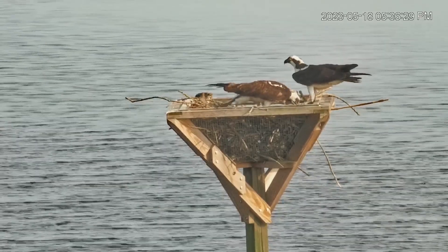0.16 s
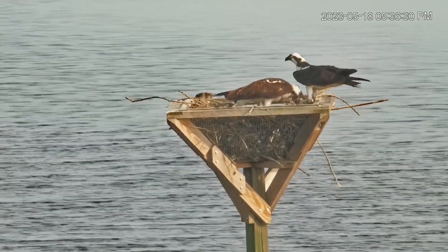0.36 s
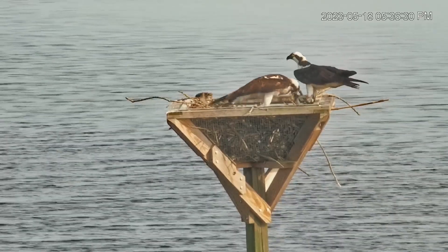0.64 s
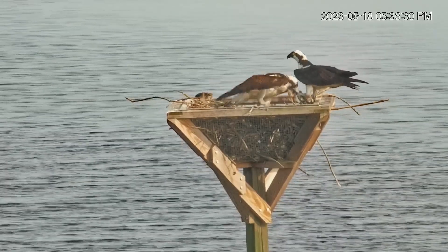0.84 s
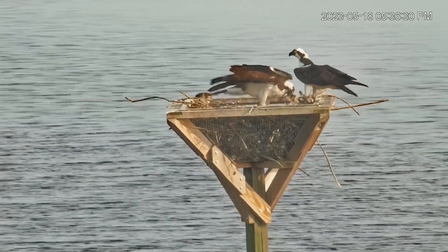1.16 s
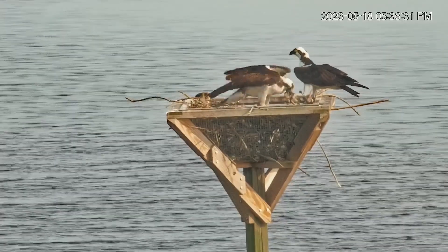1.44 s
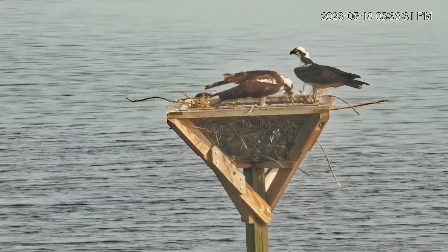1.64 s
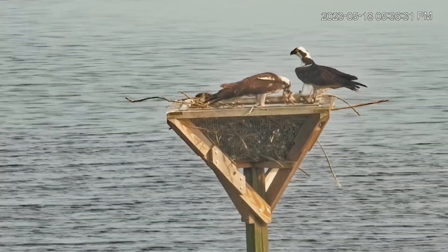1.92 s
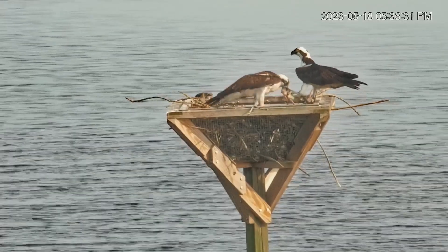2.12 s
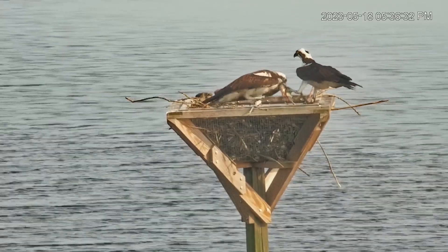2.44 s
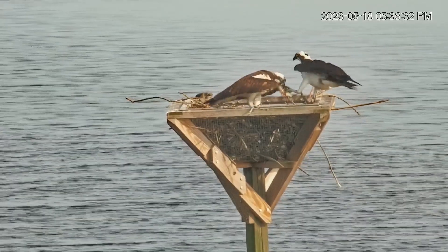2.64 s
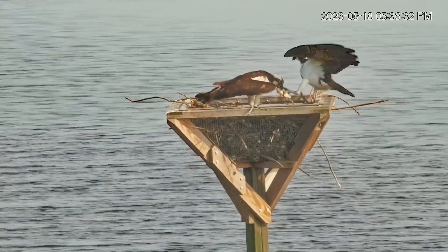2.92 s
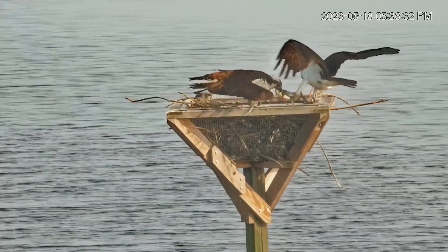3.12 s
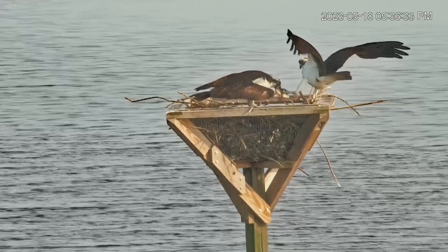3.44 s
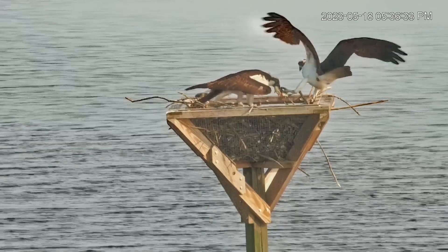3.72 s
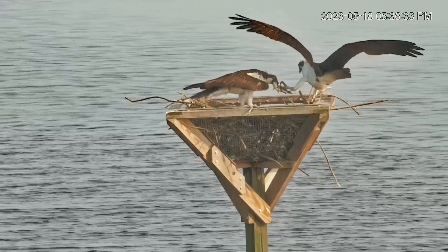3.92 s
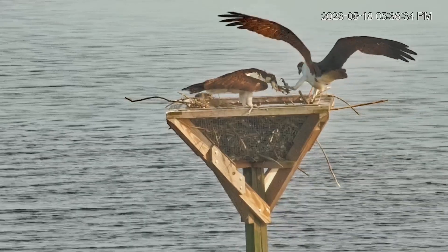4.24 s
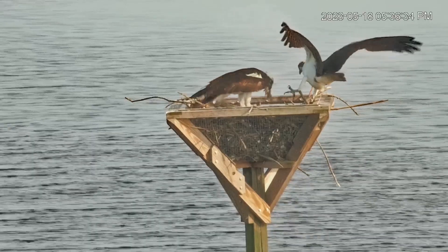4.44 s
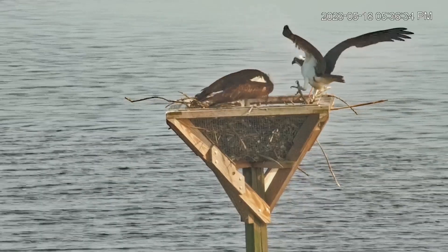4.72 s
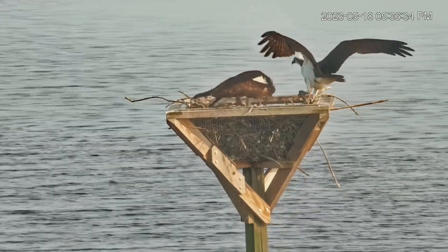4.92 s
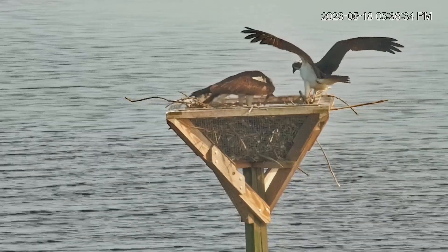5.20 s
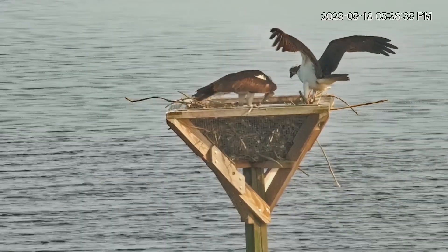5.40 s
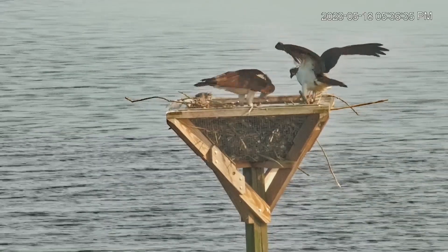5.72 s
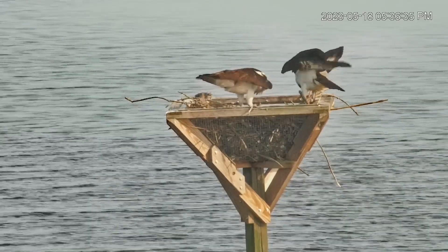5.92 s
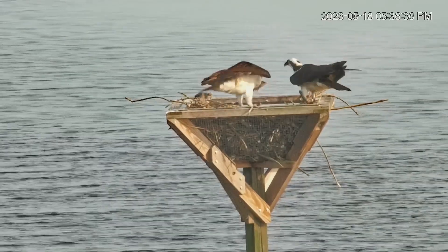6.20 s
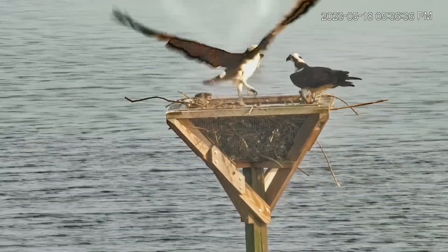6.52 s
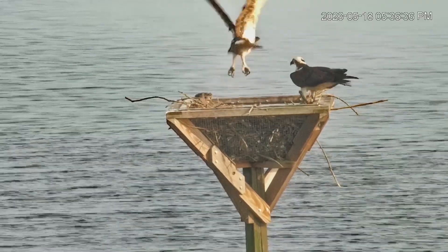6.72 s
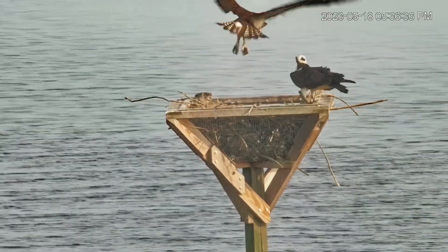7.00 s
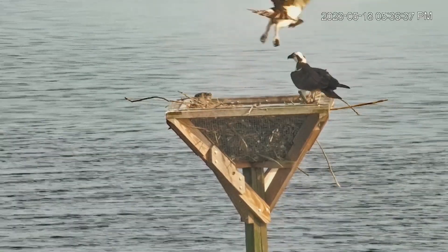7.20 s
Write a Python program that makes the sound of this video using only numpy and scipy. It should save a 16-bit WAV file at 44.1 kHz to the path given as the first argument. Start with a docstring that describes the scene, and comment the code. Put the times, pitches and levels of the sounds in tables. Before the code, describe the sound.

A small bird's faint buzzy trill opens the scene and stops before 0.5 seconds. Almost at once, from about 0.1 seconds, an osprey on a nest platform over open water begins a run of some eighteen high chirps, two or three a second. Each leaps from a sharp yelp to a thin held whistle and drops to a closing yelp, with a little hoarseness beneath. The calls space out slightly between about 4.5 and 6 seconds, then turn shorter and quicker from 6.2 seconds, the last and lowest ending near 7.1 seconds. A light echo follows them off the water. Throughout, a soft murmur of air and water continues with the faint low hum of a distant engine, which dips briefly around 5 seconds. The outdoor microphone gives the calls a slightly tinny, ringing colour.

```python
"""A small bird's buzz opens the scene and stops within half a second, over a far engine's firing tone and a
murmur of air and water that last throughout. Almost at once an osprey on a nest platform over open water
begins a long run of arched, stepped chirps: its syrinx leaps from a low note to a yelp, holds a whistle
and drops to a closing yelp, with hoarse breath beneath. Nest and water scatter the calls. Last, an outdoor
microphone's resonant housing colours the treble, and its low sampling rate adds a faint mirror above it."""
import sys
import numpy as np
from scipy import signal
from scipy.fft import rfft, irfft, next_fast_len
from scipy.io import wavfile
from scipy.ndimage import uniform_filter1d

SR = 44100
rng = np.random.default_rng(int(sys.argv[2]) if len(sys.argv) > 2 else 0)


def master_out(mix):
    """Clip the mix to full scale and print it as 16-bit PCM to the path in sys.argv[1]."""
    frames = np.transpose(np.atleast_2d(mix))
    ceiling = np.clip(frames, -1, 1)
    pcm = np.round(ceiling * 32767).astype(np.int16)
    wavfile.write(sys.argv[1], SR, pcm)


N = 324135

# envelope of the small bird's buzz: time_s, level_db
BUZZ_ENVELOPE = [(0, -53), (.36, -53), (.41, -50), (.43, -88)]
# firing tone of the far engine: time_s, pitch_hz, level_db
ENGINE_FIRING = [(0, 75.6, -51), (2.4, 79, -51.5), (2.7, 79.54, -57), (3.0, 79.8, -50), (4.4, 81.6, -54),
                 (4.7, 80, -69.5), (5.22, 81.9, -68), (5.5, 81.6, -54), (6.1, 81, -52.5), (6.5, 82.54, -57),
                 (7.35, 82.7, -52)]
# spectrum of the murmur of air and water: frequency_hz, relative_density_db
MURMUR_SPECTRUM = [(15, -1.5), (30, 1), (37, -9.5), (43, -2), (64, -12), (130, -14), (240, -23), (300, -28),
                   (450, -32), (620, -32.5), (735, -25.5), (860, -33.5), (1045, -25), (1250, -33),
                   (1800, -35.5), (2600, -49.5), (7200, -49)]
# osprey chirps, one a row: leap_s, low_note_ms, low_note_hz, low_note_db, opening_yelp_hz,
# opening_yelp_db, closing_yelp_hz, closing_yelp_db, closing_ms, breath_db
CHIRPS = [ (.094, 10, 1988, -34, 2780, -27.5, 2950, -48, 32, -61.5),
          (.516, 22, 2110, -40.5, 2961, -42.5, 3050, -47.5, 28, -64.5),
          (.873, 16, 2216, -37.5, 3000, -37, 2980, -41, 29.3, -58.5),
          (1.25, 29, 2260, -37.5, 3005, -38, 3050, -36, 35.4, -56),
          (1.686, 11, 2220, -42, 2900, -35, 3020, -40.5, 34, -57.5),
          (2.156, 9.8, 2275, -38, 2977, -34.5, 3080, -41, 30, -59),
          (2.63, 10.3, 2290, -34.5, 3090, -35, 3016, -39, 29, -63.5),
          (3.075, 12.5, 2190, -39, 2760, -35.5, 2833, -38.5, 28, -60),
          (3.459, 10, 1997, -44.5, 2660, -32.5, 2700, -41.5, 32.3, -65),
          (3.806, 9, 2150, -43.5, 2620, -34.5, 2700, -41, 31.5, -56.5),
          (4.148, 7.1, 2200, -39, 2640, -35.5, 3020, -41, 30, -60.5),
          (4.593, 11, 2248, -36.5, 3000, -36.5, 2933, -42.5, 27.7, -66),
          (5.154, 15, 2200, -41, 2850, -37.5, 2960, -40, 33, -60),
          (5.758, 12, 2200, -36.5, 2980, -36.5, 3214, -44, 35.7, -59),
          (6.225, 16.1, 2205, -45, 3000, -40, 2960, -47.5, 35, -63.5),
          (6.475, 8.8, 2498, -59, 2782, -33, 2900, -39, 25, -65),
          (6.698, 13, 2145, -40.5, 2660, -30.5, 2778, -39.5, 49.4, -64),
          (6.975, 7, 2239, -42, 2500, -36, 2600, -37.5, 30.6, -58)]
# whistle held between the two yelps, one list a chirp: time_s, pitch_hz, effort_db
HELD_WHISTLES = [
    [(.114, 4000, -38), (.128, 4370, -32), (.15, 4300, -42.5), (.157, 4150, -42), (.292, 4300, -48),
     (.336, 4160, -54), (.36, 3650, -40)],
    [(.533, 4200, -44), (.57, 4190, -51.5), (.59, 3900, -55), (.709, 4540, -43.5), (.726, 4434, -42),
     (.739, 3755, -48.5)],
    [(.906, 3940, -52.5), (.949, 3840, -57.5), (.972, 3510, -45.5), (.998, 3400, -47), (1.004, 3780, -42.5),
     (1.016, 3650, -43), (1.022, 3080, -35), (1.045, 3000, -46), (1.088, 3020, -53.5)],
    [(1.279, 3280, -44), (1.331, 3150, -46.5), (1.417, 3253, -45), (1.444, 3800, -48.5), (1.504, 3960, -47),
     (1.524, 3600, -37.5)],
    [(1.706, 3783, -42), (1.725, 3890, -67), (1.76, 3790, -41.5), (1.771, 3090, -39.5), (1.849, 3267, -44),
     (1.857, 3780, -42.5), (1.906, 3880, -64), (1.957, 4440, -51.5), (1.99, 3850, -51)],
    [(2.182, 3800, -50.5), (2.205, 3950, -63.5), (2.225, 3756, -38.5), (2.24, 3820, -46.5),
     (2.25, 3270, -40.5), (2.266, 3270, -36.5), (2.28, 3940, -52.5), (2.342, 4330, -43.5),
     (2.439, 4430, -47.5), (2.478, 4150, -40)],
    [(2.652, 3950, -57), (2.675, 3950, -55.5), (2.707, 3704, -39.5), (2.717, 3103, -43),
     (2.767, 3277, -39.5), (2.78, 3975, -56.5), (2.878, 4185, -41), (2.905, 4160, -58.5),
     (2.917, 3767, -46)],
    [(3.097, 3840, -48), (3.119, 4050, -53), (3.135, 3890, -56), (3.155, 3753, -43.5), (3.251, 3863, -47),
     (3.262, 3900, -55), (3.298, 4185, -42), (3.332, 3630, -49)],
    [(3.485, 3860, -44), (3.505, 3970, -46.5), (3.56, 3883, -54.5), (3.656, 4084, -49), (3.674, 3890, -50),
     (3.686, 3520, -41.5)],
    [(3.834, 3767, -46), (3.855, 3870, -49), (3.895, 3650, -44.5), (4.003, 3786, -51.5),
     (4.024, 3560, -39.5)],
    [(4.173, 3780, -52), (4.197, 4000, -48), (4.239, 3700, -49), (4.345, 4013, -50), (4.365, 4120, -45.5),
     (4.415, 4246, -40.5), (4.435, 4140, -48), (4.447, 3700, -55)],
    [(4.614, 4000, -41), (4.632, 4180, -45), (4.662, 4150, -51), (4.672, 3900, -54), (4.72, 3920, -54.5),
     (4.775, 4180, -42.5), (4.806, 4415, -39), (4.865, 4317, -49.5), (4.901, 3520, -42.5)],
    [(5.186, 2970, -45.5), (5.255, 2830, -37), (5.33, 2986, -52.5), (5.36, 3077, -44), (5.389, 3155, -41.5),
     (5.398, 3946, -46), (5.495, 4167, -38.5), (5.527, 3810, -47)],
    [(5.786, 3850, -43.5), (5.808, 3800, -60.5), (5.821, 3030, -39.5), (5.845, 2950, -47.5),
     (5.91, 3000, -42), (5.95, 3240, -39), (5.955, 3967, -45.5), (6.025, 4043, -53.5), (6.057, 3760, -48.5)],
    [(6.252, 3230, -30.5), (6.261, 3200, -39.5), (6.264, 3930, -39), (6.283, 3660, -45),
     (6.292, 3010, -41.5), (6.347, 2957, -52)],
    [(6.497, 4000, -49.5), (6.52, 4000, -47), (6.538, 3880, -47), (6.556, 3570, -43)],
    [(6.719, 3696, -29.5), (6.729, 3850, -40), (6.734, 3900, -65), (6.742, 3780, -40), (6.756, 3680, -35),
     (6.782, 3506, -46)],
    [(7.01, 2840, -45), (7.056, 2540, -39), (7.099, 2645, -36), (7.11, 2570, -38)],
]
# strength of the whistle's second partial: fundamental_hz, relative_db
OCTAVE_LEVELS = [(2200, -4), (2500, -12.5), (2950, -7.5), (3150, -13.5), (3300, -24.5), (3700, -27.5)]
# other half of the syrinx, joining on strained high notes: start_s, end_s, above_whistle_hz, relative_db
SECOND_VOICE = [(.12, 0.153, 1000, -15), (0.169, 0.34, 700, -10.5), (.6, 0.729, 800, -12),
                (0.911, 0.988, 347.2, -7), (1.439, 1.49, 450, -6), (1.91, 1.98, 201, -6),
                (2.331, 2.472, 198.5, -4.5), (2.85, 2.909, 450, -9), (3.5, 3.67, 1000, -14),
                (4.348, 4.447, 330, -13), (4.62, 4.666, 350, -3.5), (4.709, 4.774, 420, -1),
                (4.83, 4.879, 720, -2)]
# resonances of the microphone housing: centre_hz, width_hz, gain_db
HOUSING_MODES = [(2220, 275, 1), (2689, 125.5, 0), (2970, 71, -0.5), (3237, 108, -7.5), (3725, 174, -6.5),
                 (4195, 30, -21.5), (4270, 76, -26.5), (5820, 73, -31.5), (5840, 210, -18.5),
                 (7035, 120, -20.5)]
# cancellations in the housing's port: centre_hz, width_hz
PORT_NOTCHES = [(2740, 69), (3060, 26), (3430, 50), (4060, 51)]


def undb(db):
    """Decibels as an amplitude ratio."""
    return 10 ** (np.asarray(db) / 20)


def level(x, db):
    """Scale to an RMS level."""
    return x * undb(db) / np.sqrt(np.mean(x ** 2))


def curve(rows):
    """Interpolate the columns after time_s at every sample."""
    s, *columns = np.transpose(rows)
    return [np.interp(np.arange(N) / SR, s, c) for c in columns]


def shaped(x, gain):
    """Linear filtering: multiply the spectrum by a complex gain(hz)."""
    size = next_fast_len(N + SR // 4)
    hz = np.maximum(np.arange(size // 2 + 1) * SR / size, 1)
    return irfft(rfft(x, size) * gain(hz), size)[:N]


def mode(hz, centre_hz, width_hz):
    """Response of a damped resonator, unity at its centre."""
    return 1j * width_hz * hz / (centre_hz ** 2 - hz ** 2 + 1j * width_hz * hz)


def wander(rate_hz):
    """Random steps smoothed twice, with a spread near 1."""
    hold = int(SR / rate_hz)
    steps = np.repeat(rng.standard_normal(N // hold + 1), hold)
    return 1.3 * uniform_filter1d(uniform_filter1d(steps, hold), hold)[:N]


def band_noise(centre_hz, width_hz):
    """White noise through a resonance twice, at unit RMS."""
    return level(shaped(rng.standard_normal(N), lambda hz: mode(hz, centre_hz, width_hz) ** 2), 0)


def small_bird_buzz(puff_hz=104):
    """Amplitude modulation breaks narrow noise into a fast trill of puffs, strong and weak in turn."""
    beat = 2 * np.pi * np.cumsum(puff_hz * (1 + .08 * wander(30))) / SR
    puffs = np.exp(.5 * np.cos(beat) + .19 * np.cos(beat / 2))
    bands = band_noise(2660, 140) + band_noise(2960, 150) + undb(-3) * band_noise(3760, 360)
    return undb(curve(BUZZ_ENVELOPE)[0]) * level(puffs * bands, 0)


def far_engine():
    """Periodic firing gives a tone and its octave, which waver with the air path over a resonant rumble."""
    hz, tone_db = curve(ENGINE_FIRING)
    phase = 2 * np.pi * np.cumsum(hz + .8 * wander(10)) / SR
    amplitude = np.sqrt(2) * undb(tone_db + 1.6 * wander(11))
    partials = np.sin(phase) + undb(-19.5 + wander(14)) * np.sin(2 * phase)
    rumble_db = np.interp(tone_db, [-70, -52], [-63, -67]) + 2.8 * wander(5)  # swells as the tone fades
    return amplitude * partials + undb(rumble_db) * band_noise(201.3, 54)


def murmur():
    """Air and water make stationary noise, strongest in the bass."""
    points_hz, db = np.transpose(MURMUR_SPECTRUM)
    coloured = shaped(rng.standard_normal(N), lambda hz: undb(np.interp(np.log(hz), np.log(points_hz), db)))
    return level(coloured, -58)


def shore_wash():
    """Far birds and lapping water add incoherently into a treble wash whose bands flicker independently."""
    centres_hz = 2100 * 1.56 ** np.arange(7)
    bands = (undb(3.3 * wander(14) + 1.13 * k) * band_noise(hz, hz / 2.9) for k, hz in enumerate(centres_hz))
    return level(sum(bands), -56.5)


def chirp_contour(row, held, leap_s=.003, swell_s=.0056, fade_db_per_s=399, release_s=.014):
    """Register breaks divide one chirp into steps; returns rows of time_s, pitch_hz, effort_db."""
    leap_at, low_ms, low_hz, low_db, open_hz, open_db, close_hz, close_db, close_ms, _ = row
    (held_from, held_hz, _), held_to = held[0], held[-1][0]
    crest, next_leap = leap_at + leap_s + swell_s, held_from - leap_s
    end = held_to + close_ms / 1000
    last_break = end - release_s + .004
    rise_hz = min(.1 * open_hz, held_hz - open_hz)
    sagged_hz, last_hz = .89 * close_hz, .94 * low_hz
    return [(leap_at - low_ms / 1000, .9 * low_hz, low_db - 19),  # slides up to the low note
            (leap_at, low_hz, low_db),
            (leap_at + leap_s, open_hz, open_db - 3),  # the opening yelp climbs as it swells and fades
            (crest, open_hz + .4 * rise_hz, open_db),
            (next_leap, open_hz + rise_hz, open_db - fade_db_per_s * (next_leap - crest)),
            *held,
            (held_to + leap_s, close_hz, close_db - 1),  # the closing yelp sags as it swells
            (end - release_s, sagged_hz, close_db),
            (last_break, .98 * sagged_hz, close_db - 12.5),
            (last_break + leap_s, last_hz, close_db - 12.5),  # a faint low note dies away
            (end, .9 * last_hz, close_db - 27.5)]


def osprey(thinning_hz_per_s=150e3):
    """Biphonation: the syrinx sounds a near-pure tone and a rougher second voice, over rasping breath."""
    hz = np.full(N, 2e3)
    effort, breath, above_hz, second_gain = np.zeros((4, N))
    for row, held in zip(CHIRPS, HELD_WHISTLES):
        contour = chirp_contour(row, held)
        on = slice(int(contour[0][0] * SR), int(contour[-1][0] * SR))
        pitch_hz, effort_db = curve(contour)
        hz[on], effort[on], breath[on] = pitch_hz[on], undb(effort_db[on]), undb(row[-1])
    for start_s, end_s, offset_hz, relative_db in SECOND_VOICE:
        on = slice(int(start_s * SR), int(end_s * SR))
        above_hz[on], second_gain[on] = offset_hz, undb(relative_db)
    phase = 2 * np.pi * np.cumsum(hz * (1 + .003 * wander(150))) / SR
    second_phase = phase + 2 * np.pi * np.cumsum(above_hz + 90 * wander(400)) / SR
    second_gain = uniform_filter1d(second_gain, size=500) * undb(4.7 * wander(100))
    effort = uniform_filter1d(effort, size=130) * undb(1.2 * wander(200))
    # the tone thins while the pitch leaps between registers
    leap_speed = np.abs(np.gradient(hz)) * SR / thinning_hz_per_s
    amplitude = np.sqrt(2) * effort / (1 + uniform_filter1d(leap_speed, size=40) ** 2)
    octave = undb(np.interp(hz, *np.transpose(OCTAVE_LEVELS))) * np.sin(2 * phase)
    # the membranes flutter on the low yelps and wherever the two voices pull on each other
    flutter = 1 + (.83 * second_gain + np.clip((3000 - hz) / 3500, 0, 1) + .033) * wander(450)
    whistle = amplitude * (flutter * np.sin(phase) + octave + second_gain * np.sin(second_phase))
    rasp = sum(undb(db + 4.07 * wander(40)) * band_noise(centre_hz, width_hz)
               for centre_hz, width_hz, db in [(2304, 630, -6.5), (2970, 1000, -5), (3950, 2700, -9)])
    return whistle + uniform_filter1d(breath, size=900) * rasp


def with_reflections(direct, nest_db=-6.5, nest_t60_s=.035, water_db=-25.5, water_t60_s=.59):
    """Diffuse scatter decays exponentially: fast off nest and platform, slowly from across the water."""
    s = np.arange(SR // 2) / SR
    tail = 0
    for db, t60_s in [(nest_db, nest_t60_s), (water_db, water_t60_s)]:
        decay = rng.standard_normal(len(s)) * undb(-60 * s / t60_s)
        tail = tail + undb(db) * decay / np.sqrt(np.sum(decay ** 2))
    return direct + signal.fftconvolve(direct, tail)[:N]


def housing(hz, cutoff_hz=2000):
    """Modal superposition with alternating signs; the port passes little below the lowest mode."""
    response = sum((-1) ** k * undb(db) * mode(hz, centre_hz, width_hz)
                   for k, (centre_hz, width_hz, db) in enumerate(HOUSING_MODES))
    for centre_hz, width_hz in PORT_NOTCHES:
        response = response * (1 - .78 * mode(hz, centre_hz, width_hz))
    return response * mode(hz, cutoff_hz, cutoff_hz) * hz / cutoff_hz


def scene():
    """Superposition in one channel: birds and shore pass through the housing; engine and murmur bypass it."""
    treble = with_reflections(osprey() + small_bird_buzz()) + shore_wash()
    return (shaped(treble, housing) + far_engine() + murmur())[None]


def record(dry, rate_hz=16000, top_hz=7260, mirror_band_hz=(8680, 10200), hiss_db=-100):
    """Spectral imaging: sampling mirrors the upper treble about half its rate, over converter hiss."""
    passband = signal.sosfilt(signal.ellip(14, .2, 70, top_hz, fs=SR, output="sos"), dry)
    images = passband * np.cos(2 * np.pi * rate_hz * np.arange(N) / SR)
    mirror = signal.sosfilt(signal.ellip(5, .5, 60, mirror_band_hz, "band", fs=SR, output="sos"), images)
    mirror = signal.sosfilt(signal.butter(8, 8900, fs=SR, output="sos"), mirror)
    converted = passband + undb(-4) * mirror + undb(hiss_db) * rng.standard_normal(N)
    return signal.sosfilt(signal.ellip(8, .2, 6, 15600, fs=SR, output="sos"), converted)


dry = scene()
out = record(dry)
master_out(out)
```